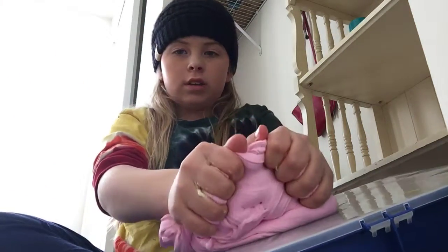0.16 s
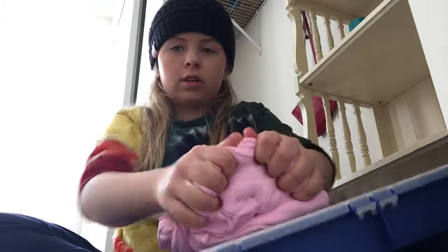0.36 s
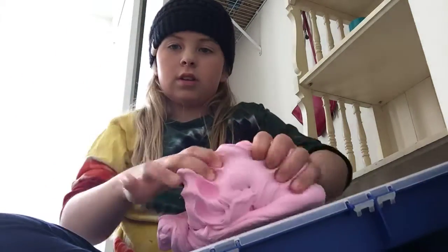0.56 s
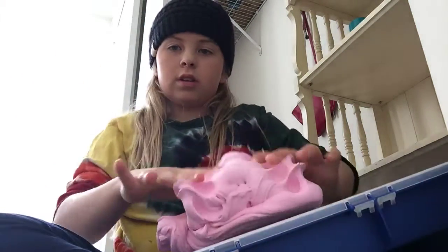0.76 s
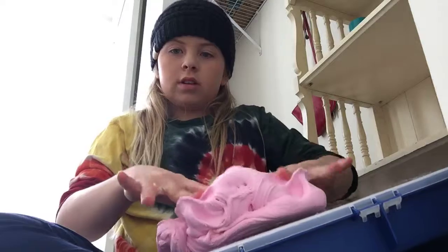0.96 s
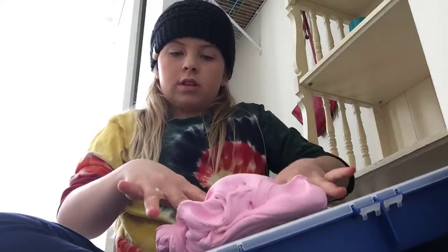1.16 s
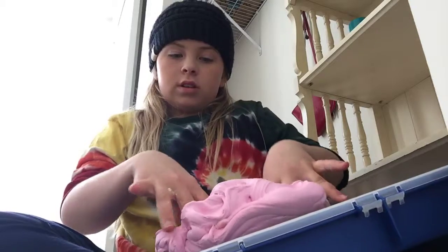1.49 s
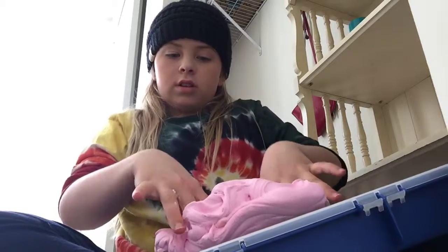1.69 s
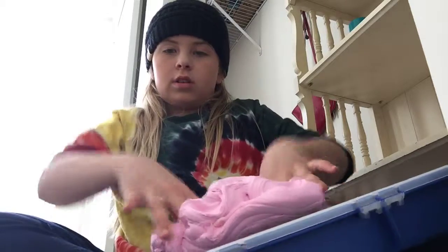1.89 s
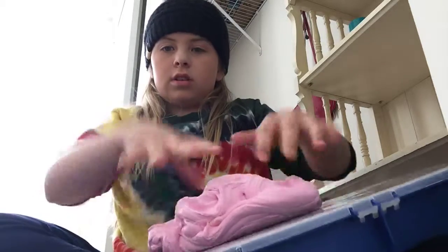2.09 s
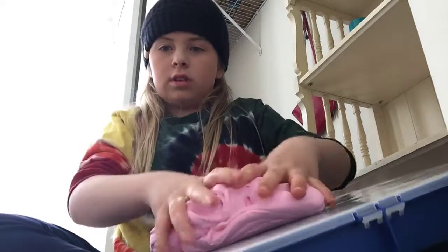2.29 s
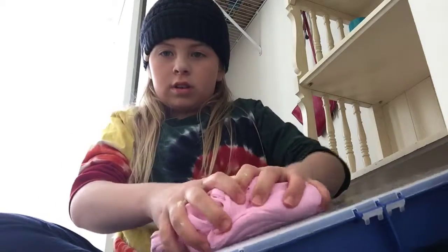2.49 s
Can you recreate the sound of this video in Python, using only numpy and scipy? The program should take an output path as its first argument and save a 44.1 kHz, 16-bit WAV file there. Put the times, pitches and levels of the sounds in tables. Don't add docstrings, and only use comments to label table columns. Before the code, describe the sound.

Close up in a small room, kneaded slime pops loudly once at the start, peels with tiny wet clicks, then fingers knock the plastic lid and a push rumbles it around two seconds, over quiet low hum.

```python
import sys
import numpy as np
from scipy import signal
from scipy.fft import rfft, irfft, next_fast_len
from scipy.io import wavfile
from scipy.ndimage import uniform_filter1d, map_coordinates

SR = 44100
rng = np.random.default_rng(int(sys.argv[2]) if len(sys.argv) > 2 else 0)


def boost_factor(decibels):
    exponent = np.asarray(decibels, float) / 20
    return 10 ** exponent


def transcribe(u):
    v = np.clip(np.atleast_2d(u).T, -1, 1)
    q = np.round(v * 32767).astype(np.int16)
    wavfile.write(sys.argv[1], SR, q)


N = 116865


def noise(size=N):
    return rng.standard_normal(size)


def unit(x):
    return x / np.sqrt(np.mean(x ** 2) + 1e-20)


def along(points, hz):
    f, value = np.transpose(points)
    return np.interp(np.log(hz + 1), np.log(f + 1), value)


def curves(rows):
    s, *columns = np.transpose(rows)
    return [np.interp(np.arange(N) / SR, s, column) for column in columns]


def wobble(rate):
    knots = noise(int(N * rate / SR) + 4)
    return map_coordinates(knots, [np.arange(N) * rate / SR])


def filtered(x, response):
    size = next_fast_len(len(x) + 8192)
    spectrum = rfft(x, size) * response(np.fft.rfftfreq(size, 1 / SR))
    return irfft(spectrum, size)[:len(x)]


def peak(f, hz, width_hz):
    return 1j * f * width_hz / (hz * hz - f * f + 1j * f * width_hz)


def coloured(x, spectrum):
    return unit(filtered(x, lambda f: boost_factor(along(spectrum, f))))


def patchy(x, patch_db):
    z = signal.stft(x, nperseg=256)[2]
    field = uniform_filter1d(noise(z.shape), size=12, axis=0)
    field = uniform_filter1d(field, size=8, axis=1)
    return unit(signal.istft(z * boost_factor(patch_db * unit(field)), nperseg=256)[1][:N])


def add(track, s, sound):
    part = track[max(round(s * SR), 0):][:len(sound)]
    part += sound[:len(part)]


def bubble_click(hz, low_db):
    sharpness, body_hz, body_db = 1.61, 4300, -30.5
    kick = signal.unit_impulse(SR // 4)

    def response(f):
        snap = peak(f, hz, hz / sharpness) ** 2
        return snap + boost_factor(body_db + low_db) * peak(f, body_hz, 7.5 * body_hz)

    click = filtered(kick, response)[:256]
    return click / np.abs(click).max()


def near_room():
    # (delay [s], level [dB])
    walls = [(.0008, -20), (.0016, -26), (.004, -21), (.005, -20), (.0058, -21), (.0066, -24), (.0136, -21),
             (.0245, -25)]
    # (frequency [Hz], t60 [s])
    decay = [(500, .15), (4000, 0.39), (12000, 0.13)]
    tail_db, wall_db, blur_s = -14, 2.5, 0.00048
    size, tail_start = SR // 4, round(0.0029 * SR)
    f, t, z = signal.stft(noise(size), SR, nperseg=128)
    fading = z * boost_factor(-60 * t / along(decay, f)[:, None])
    tail = signal.istft(fading, SR, nperseg=128)[1][:size]
    space = boost_factor(tail_db) * np.roll(tail / np.linalg.norm(tail), tail_start)
    space[0] += 1
    space[1:tail_start] = 0
    for delay, db in walls:
        blur = noise(64) * np.exp(-np.arange(64) / SR / blur_s)
        add(space, delay, boost_factor(db + wall_db) * blur / np.linalg.norm(blur))
    return space


def pops():
    # (time [s], peak level [dB], centre [Hz], low part [dB])
    bursts = [(.004, -47.5, 11000, 3), (.0293, -50, 13700, 0), (.043, -57, 14000, 0),
              (0.055, -58, 13000, 0), (0.0829, -40.5, 11600, -9), (0.09, -42, 13000, -4),
              (0.1064, -49, 11000, -14), (0.1205, -33.5, 13350, 10), (0.148, -8, 13550, -4.5),
              (0.1477, -42, 3170, 0), (0.1816, -27, 12700, 12), (0.25, -52, 11500, 6.5),
              (.2755, -70, 12500, 3), (0.2963, -49.5, 8700, 24), (0.3389, -36, 13400, 23),
              (0.3465, -28.5, 9450, 6.5), (.3461, -27, 13800, 4), (0.367, -58, 11500, 11.5),
              (.3765, -67, 13000, -2), (.558, -52.5, 5900, -4), (0.5808, -51, 6900, 0),
              (.890, -36, 11000, -1), (1.22, -49, 14000, -1), (1.2627, -45.5, 13400, 15),
              (1.308, -52.5, 11400, -5), (1.4502, -54, 2420, 7), (1.5025, -53, 5200, 9),
              (1.5416, -45.5, 8200, 13), (1.685, -59.5, 9300, 7), (1.6969, -54, 3000, 10),
              (1.6966, -56, 7000, 12.5), (1.7643, -53, 14400, 3), (2.1302, -47, 4940, 10.5),
              (2.385, -61, 3000, 5), (2.573, -47.5, 14500, -3), (2.588, -52.5, 13500, 27),
              (2.615, -60, 6030, 10)]
    out, lag_s = np.zeros(N), 0.0021
    for s, db, hz, low_db in bursts:
        burst = signal.fftconvolve(near_room(), bubble_click(hz, low_db))
        add(out, s + lag_s, boost_factor(db) * burst)
    return out


def peeling():
    # (time [s], length [s], level [dB], dull part [dB])
    strokes = [(0, 0.005, -65.5, -26), (0.018, 0.25, -77, -4), (0.181, 0.034, -76, -8),
               (0.258, 0.053, -78, -6), (0.51, 0.052, -72.5, 1.5), (0.559, 0.03, -70, 2),
               (0.598, 0.11, -71, 1.5), (0.708, 0.055, -62, -3), (0.775, 0.032, -68.5, 1.5),
               (0.826, 0.024, -78, -2), (0.864, 0.032, -70, 1.5), (0.922, 0.063, -79.5, -11.5),
               (1.212, 0.022, -76.5, -2), (1.259, 0.015, -69.5, 0), (1.391, .13, -80.5, -19),
               (1.503, 0.024, -88, 14), (1.765, 0.028, -83, -3), (2.094, 0.043, -75.5, 5),
               (2.121, 0.043, -71.5, 3.5), (2.374, 0.048, -84.5, 10.5), (2.559, 0.084, -83.5, 9)]
    # (frequency [Hz], level [dB per Hz])
    fizz_colour = [(3000, -31.5), (7000, -12.5), (10500, -10.5), (14000, -4), (16500, -15.5)]
    # (frequency [Hz], level [dB per Hz])
    squish_colour = [(300, -30.5), (700, -1), (2000, -6), (5000, -5), (9000, -18)]
    rise_s, fall_s, squish_db = 0.0088, 0.014, -4
    clump_db, patch_db = 1.2, 1.6
    clicks_per_s, spread_db = 8000, 1.6

    def grains():
        struck = rng.random(N) < clicks_per_s / SR
        return struck * noise() * boost_factor(spread_db * rng.exponential(size=N))

    t, bright, dull = np.arange(N) / SR, np.zeros(N), np.zeros(N)
    for s, length, db, dull_db in strokes:
        rise = np.clip((t - s) / rise_s + 0.5, 0, 1) ** 2
        shape = rise * np.exp(-np.maximum(t - s - length, 0) / fall_s)
        bright += boost_factor(db) * shape
        dull += boost_factor(db + dull_db + squish_db) * shape
    fizz = patchy(coloured(grains(), fizz_colour), patch_db)
    squish = patchy(coloured(grains(), squish_colour), patch_db)
    bright *= boost_factor(clump_db * wobble(50))
    dull *= boost_factor(clump_db * wobble(60.37))
    return bright * fizz + dull * squish


def knocks():
    # (time [s], peak level [dB], favoured mode [Hz], loss above it [dB per octave], swell [cycles])
    touches = [(0.2707, -38.5, 380, 13, 0.27), (.2705, -45.5, 800, 3, 0.38), (0.2711, -52.5, 1480, 4, .5),
               (.525, -36, 290, 5.5, 0.85), (.578, -53, 372, 14, 1.37), (0.637, -50.5, 331, 15, 0.94),
               (0.743, -51, 380, -7, 0.6), (0.794, -44, 160, 4, 0.51), (1.025, -44, 204, 11, 1.2),
               (1.073, -40, 204, 4.5, 0.77), (1.078, -47, 530, -2.5, 1.16), (1.08, -33.5, 186, 13.5, 0.47),
               (1.088, -47, 408, 9, 0.8), (1.44, -31, 195, 8, 0.43), (1.448, -30.5, 426, 10, 0.46),
               (1.4489, -45.5, 1000, 20, .8), (1.451, -33.5, 297, 15, 0.38), (1.5031, -59, 1900, 11, 0.86),
               (1.52, -57.5, 1500, 6, 1), (1.6505, -40, 1366, 22, 1.24), (1.6505, -26.5, 205, 6, 0.65),
               (1.653, -33.5, 385, 5.5, 1.04), (2.095, -49, 1200, 3, .7), (2.105, -28.5, 570, 29, 1.5),
               (2.1313, -35.5, 706, 8.5, 0.21), (2.1315, -44.5, 1360, 5, .6), (2.151, -47, 960, -1.5, .7),
               (2.182, -35.5, 193, 5, 0.76), (2.315, -36, 204, 5.5, 0.64), (2.386, -36.5, 205, 1.5, 0.42),
               (2.386, -58.5, 1450, 12, 0.66), (2.399, -58.5, 1436, 8.5, 1.2),
               (2.406, -39.5, 415, 7.5, 1.33), (2.588, -59, 1590, -0.5, 0.84),
               (2.626, -59.5, 2720, 3, 0.99), (2.626, -61, 1960, 12, .8)]
    # (frequency [Hz], level [dB], t60 [s])
    lid = [(158.6, 5, 0.064), (205, 9, 0.043), (290, -0.5, 0.055), (380, 9.5, 0.028), (570, -3, 0.037),
           (800, -6, 0.025), (1050, -8.5, 0.015), (1446, -9, 0.01), (1970, -20, 0.011), (2750, -20, 0.011)]
    lag_s, knock_db = 0.00055, -1.5
    below_db = 9
    focus_db, focus_octaves = 6.5, 0.14
    scatter_db, scatter = 1.5, 0.015
    thud_db, thud_t60, thud_width = -17.5, 0.24, 0.47
    out, t = np.zeros(N), np.arange(SR // 4) / SR
    hz, level_db, t60 = np.transpose(lid)[:, :, None]
    for s, db, spot_hz, loss_db, swell in touches:
        chance = noise((len(lid), 2))
        octaves = np.log2(hz / spot_hz)
        mix_db = level_db - np.maximum(loss_db * octaves, -below_db * octaves)
        mix_db = mix_db + focus_db * np.exp(-(octaves / focus_octaves) ** 2) + scatter_db * chance[:, :1]
        tones = np.sin(2 * np.pi * hz * (1 + scatter * chance[:, 1:]) * t)
        onset = 1 - np.exp(-(t * hz / swell) ** 2)
        ring = (boost_factor(mix_db - 60 * t / t60) * tones * onset).sum(0)
        thud = unit(filtered(noise(len(t)), lambda f: peak(f, spot_hz, thud_width * spot_hz) ** 2))
        thud *= boost_factor(thud_db - 60 * t / thud_t60 * (spot_hz / lid[1][0]) ** 0.45)
        thud *= 1 - np.exp(-(t * spot_hz / swell) ** 2)
        add(out, s + lag_s, boost_factor(db + knock_db) * (ring / np.abs(ring).max() + thud))
    return out


def shove():
    # (time [s], level [dB], deep part [dB])
    load = [(0, -68.5, -4), (.65, -65, -11.5), (.9, -68.5, -8), (1.86, -67.5, -8), (1.92, -62.5, 22),
            (1.96, -57, -2.5), (2, -48.5, 10), (2.04, -45.5, -3), (2.085, -46, 1.5), (2.19, -50, -0.5),
            (2.3, -54, -1), (2.46, -57.5, 8), (2.53, -75, 12), (2.65, -58, 3)]
    # (frequency [Hz], width [Hz], level [dB])
    resonances = [(91.4, 64, 4), (114.4, 73, -1.5), (162, 89, -5), (230.5, 31, -6), (261.7, 16, -1.5),
                  (311.4, 34, -4), (342, 28, -9)]
    lump_db, even_s = 2.5, 0.035

    def shaken(rows):
        def response(f):
            return sum((-1) ** k * boost_factor(db) * peak(f, hz, width) ** 2 for k, (hz, width, db) in enumerate(rows))

        x = filtered(noise() * boost_factor(lump_db * wobble(30)), response)
        power = np.abs(uniform_filter1d(x * x, round(even_s * SR)))
        return x / np.sqrt(power + 1e-20)

    load_db, deep_db = curves(load)
    return boost_factor(load_db) * (shaken(resonances[2:]) + boost_factor(deep_db) * shaken(resonances[:2]))


def squeaks():
    # (time [s], length [s], level [dB], pitch [Hz], width [Hz])
    rubs = [
        (2.055, .05, -79, 4150, 450),
        (2.095, .035, -79, 4500, 700),
        (2.305, .07, -81, 4150, 450),
        (.503, .035, -72, 4700, 1400),
        (.865, .035, -73, 4700, 1600),
        (2.135, .045, -75, 5800, 700),
        (2.555, .025, -77, 6200, 1500),
    ]
    out = np.zeros(N)
    for s, length, db, hz, width_hz in rubs:
        rub = unit(filtered(noise(SR // 8), lambda f: peak(f, hz, width_hz) ** 2))
        rub = rub[:round(length * SR)]
        add(out, s, boost_factor(db + 3.5) * rub * np.hanning(len(rub)))
    return out


def machine():
    # (frequency [Hz], level [dB], drift [Hz])
    lines = [(82.5, -59, 5.023), (120.4, -59, 4.25), (68.53, -66.5, 5.83), (100.5, -64.5, 5.95),
             (173.6, -71.5, 4.9), (260.4, -75, 4.6)]
    # (frequency [Hz], level [dB per Hz])
    rumble_colour = [(18, -66.5), (30, -18), (70, -5.5), (123, -7.5), (140, -11), (205, -24.5),
                     (264, -18.5), (402, -32.5), (700, -37.5), (910, -76), (1540, -120)]
    rumble_db, sway_db = -59, 2.5
    out = boost_factor(rumble_db + 0.64 * wobble(4.2)) * coloured(noise(), rumble_colour)
    for hz, db, drift_hz in lines:
        phase = 2 * np.pi * np.cumsum(hz + drift_hz / 2 * wobble(7.5)) / SR
        out += boost_factor(db + sway_db * wobble(8.3)) * np.sqrt(2) * np.sin(phase)
    return out


def microphone_hiss():
    # (frequency [Hz], level [dB per Hz])
    hiss_colour = [(290, -58.5), (500, -12), (795, -12), (1230, -12.5), (2130, -14.5), (2330, -16),
                   (13400, -24), (16000, -33)]
    return boost_factor(-77) * coloured(noise(), hiss_colour)


def scene():
    hands = pops() + peeling() + knocks() + shove() + squeaks()
    return (hands + machine() + microphone_hiss())[None]


def top_cut(x):
    return signal.sosfilt(signal.butter(12, 16750, fs=SR, output="sos"), x)


def record(dry):
    low_cut_hz, top_hz, top_roll_hz = 18, 16100, 120

    def band(f):
        low_cut = (1j * f / (low_cut_hz + 1j * f)) ** 3
        return low_cut / (1 + np.exp((f - top_hz) / top_roll_hz))

    mix = filtered(dry[0], band)[None]
    return top_cut(mix)


dry = scene()
out = record(dry)
transcribe(out)
```